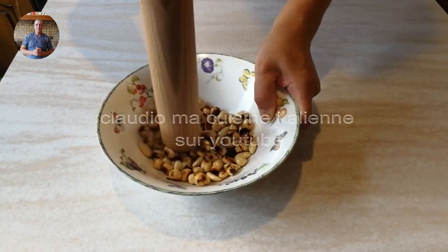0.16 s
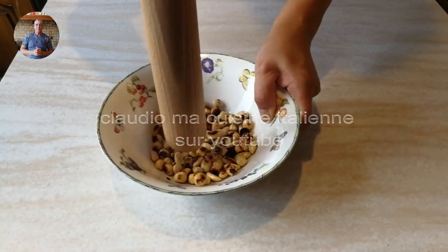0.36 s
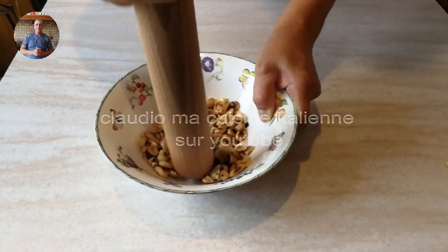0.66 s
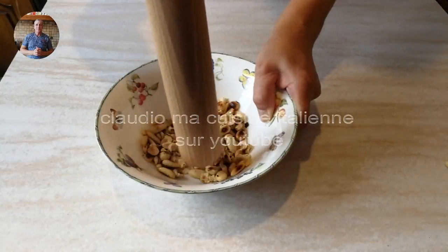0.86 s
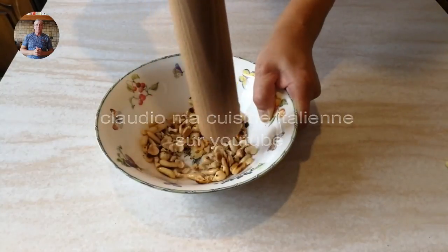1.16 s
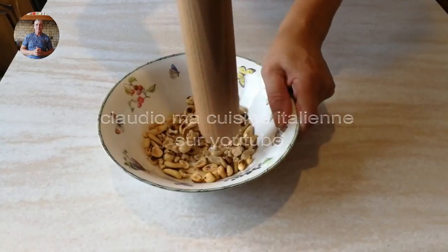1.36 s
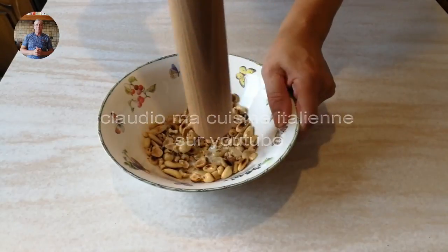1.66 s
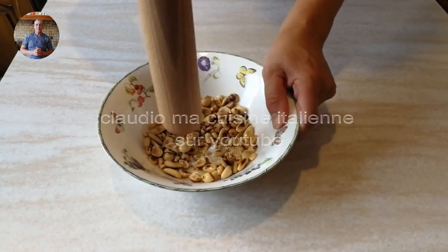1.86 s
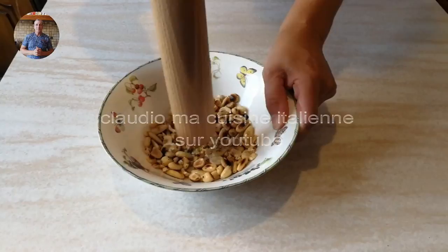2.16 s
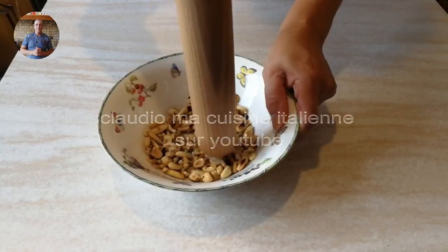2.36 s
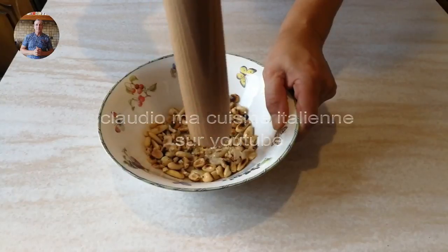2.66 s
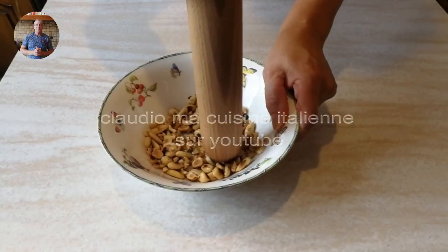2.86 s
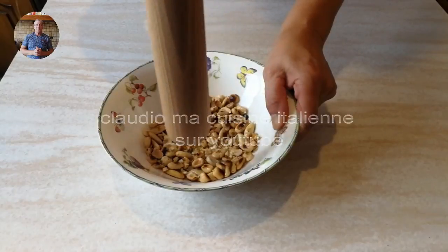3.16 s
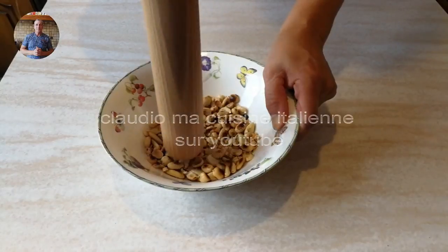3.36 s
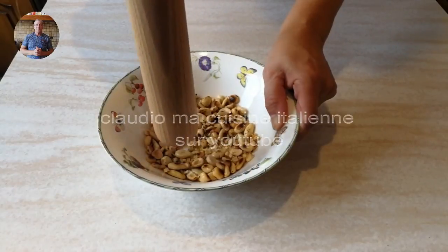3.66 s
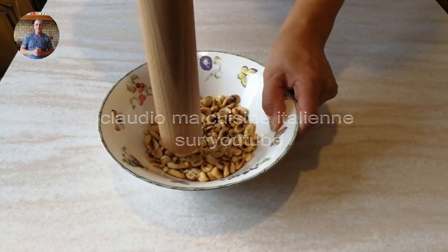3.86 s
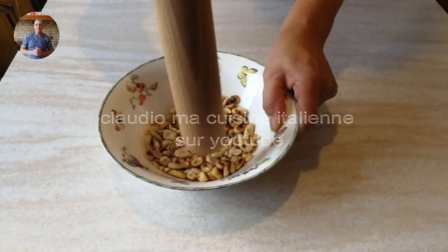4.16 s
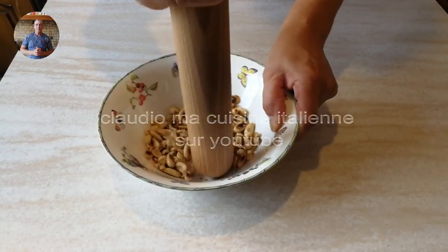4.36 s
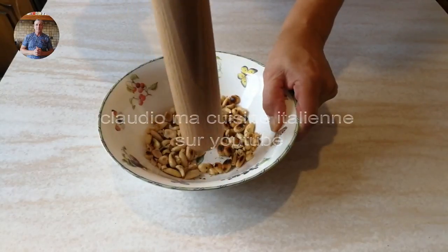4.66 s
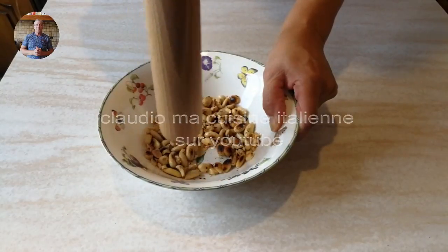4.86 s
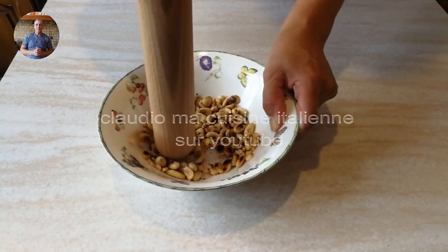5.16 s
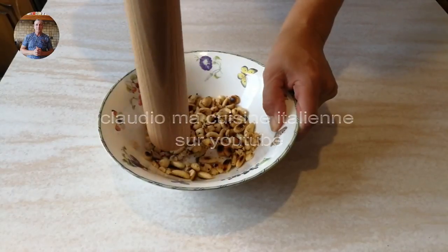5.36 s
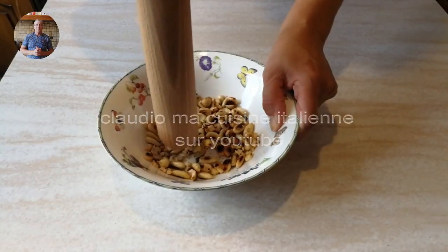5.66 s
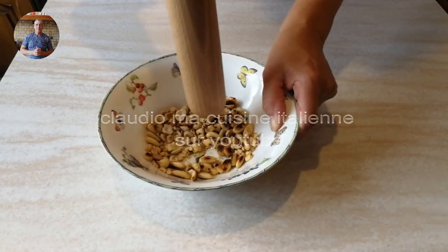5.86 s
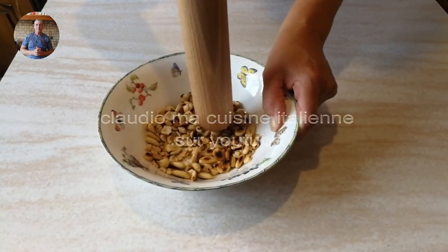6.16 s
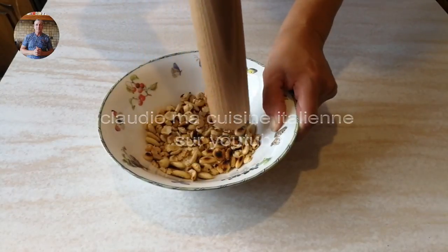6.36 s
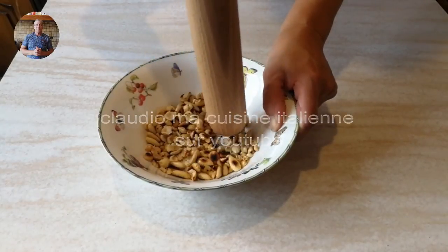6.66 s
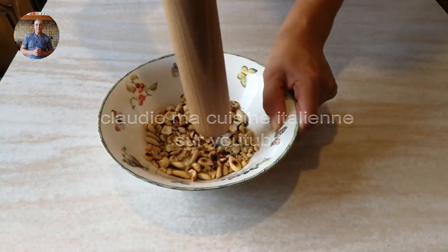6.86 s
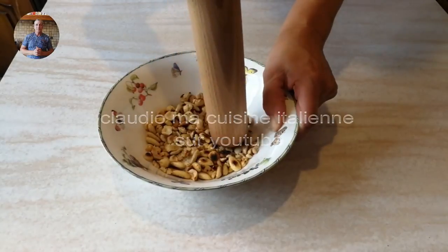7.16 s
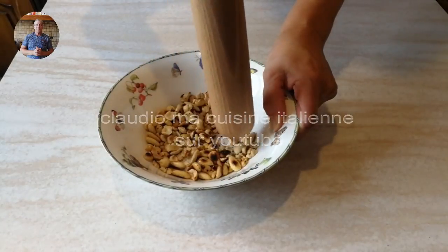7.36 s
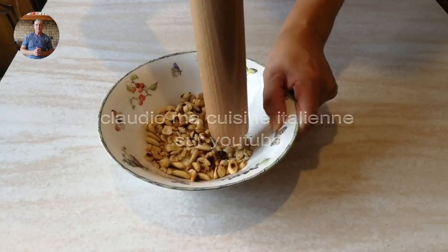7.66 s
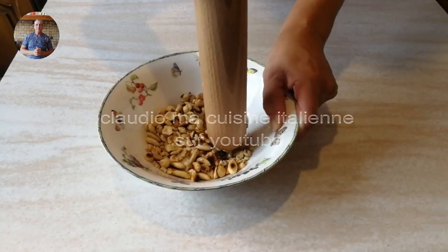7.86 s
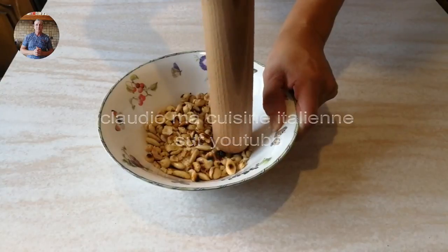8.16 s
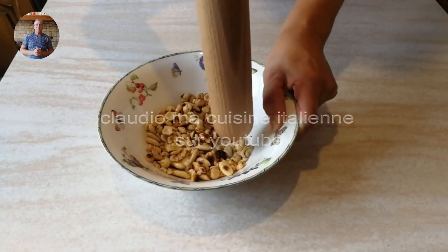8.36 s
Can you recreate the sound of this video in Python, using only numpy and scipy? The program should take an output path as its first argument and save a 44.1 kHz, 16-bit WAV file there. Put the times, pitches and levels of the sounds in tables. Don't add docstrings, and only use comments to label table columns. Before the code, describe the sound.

Close stereo pickup in a small, hard kitchen, the bowl just left of centre, over very faint fridge hum and hiss that dip around loud blows. From 0 to 0.9 s a wooden pestle presses into toasted nuts with cushioned, crunchy blows near 0.2, 0.5 and 0.7 s; shards tick the glazed wall and nuts trickle back. A sharp crack comes at 1.0 s, a firm knock and table thump at 1.5, a crisp glancing crunch at 2.0, then solid knocks at 2.4 and 2.8. The hardest woody blows fall at 3.4, 3.9 and 5.5 s, with a softer, ticking crunch at 4.3 and a dry snap at 5.2. A faint foot drag follows 3.7. Lighter touches and ceramic ticks come around 6.0 to 6.5, a muffled thump at 7.1, another faint drag at 7.3, then steady knocks at 7.5, 7.8, 8.2 and 8.5, each with short room reflections.

```python
import sys
import numpy as np
from scipy import signal
from scipy.fft import rfft, irfft, next_fast_len
from scipy.io import wavfile
from scipy.ndimage import uniform_filter1d, minimum_filter1d

SR = 44100
rng = np.random.default_rng(int(sys.argv[2]) if len(sys.argv) > 2 else 0)


def to_wav(s):
    ch = np.atleast_2d(s).T
    pcm = np.round(np.clip(ch, -1, 1) * 32767)
    wavfile.write(sys.argv[1], SR, pcm.astype(np.int16))


def volts(x):
    e = np.asarray(x, float) / 20
    return 10 ** e


N = 375732
PAD = SR // 2
M = N + 3 * PAD

# (frequency [Hz], density [dB per Hz])
AIR_COLOUR = [(15, -85.5), (25, 3.5), (70, -24.5), (102, -2.5), (137, -32), (170, -20), (373, -26.5),
              (405, -22), (560, -25.5), (2000, -28), (2350, -30), (4740, -29.5), (16000, -43)]
# (frequency [Hz], likeness [-1 to 1])
LIKENESS = [(100, 0.99), (200, 0.96), (300, 0.74), (500, -0.53), (1000, 0.088), (3000, 0.025),
            (12000, -0.088)]
# (time [s], knock peak [dB], cushion of nuts under the pestle [dB], table thump [dB], table drum [dB])
BLOWS = [(-0.11, -46, 10, -46, -45), (0.183, -33, 20, -27, -33), (0.465, -26, 29, -28.5, -44.5),
         (0.695, -46, 20, -43, -56), (0.969, -19, 38, -33.5, -45), (1.468, -15, 5.5, -25, -33.5),
         (2.023, -37, 31, -44, -53), (2.408, -20, 7.5, -24, -35), (2.828, -17.5, 6, -24.5, -28),
         (3.415, -8.5, 7.5, -28, -36), (3.904, -8, 8.5, -29, -32.5), (4.346, -30.5, 14, -34.5, -51.5),
         (5.163, -19.5, 15, -32.5, -57.5), (5.212, -41, 3.5, -64.5, -67.5), (5.533, -7.5, 3, -29.5, -33.5),
         (6.068, -62, 5.5, -39.5, -53), (6.513, -40, 18, -34.5, -54), (7.091, -26.5, 31.5, -24.5, -36.5),
         (7.463, -51, 4.5, -43, -62), (7.481, -17, 7, -40, -46.5), (7.761, -22.5, 9, -30.5, -40.5),
         (8.160, -14.5, 10, -28.5, -38), (8.501, -13.5, 15, -20, -25)]
# (frequency [Hz], width [Hz], level [dB])
WOOD = [(632, 150, -9), (781, 90.5, 1), (890, 95, 1), (1050, 120, -1.5), (1290, 260, -5.5)]
# (frequency [Hz], width [Hz], level [dB])
CAVITY = [(270, 53, -1.5), (383.5, 23.7, 2), (516.6, 63, -1.5)]
# (frequency [Hz], width [Hz], level [dB])
HARD = [(1540, 170, 0), (2110, 554, 2.5), (2890, 730, -3.5), (4060, 1100, -15)]
# (frequency [Hz], level [dB], t60 [s])
TABLE = [(119.6, 4, 0.18), (102, -13.5, 0.086), (181, 2, 0.075), (46, -15, 0.58)]
# (frequency [Hz], level [dB], t60 [s])
DRUM = [(164, 0, 1.1)]
# (frequency [Hz], t60 [s])
KITCHEN_T60 = [(100, 0.41), (300, 0.3), (800, 0.38), (2000, 0.28), (5000, 0.39), (12000, 0.37)]
# (frequency [Hz], level [dB])
WALLS = [(100, 16.5), (400, 7.5), (1000, 0.5), (3000, -7.5), (8000, -8), (15000, -8.5)]
# (frequency [Hz], left over right [dB])
LEFT = [(100, -0.1), (250, 2), (600, 3.5), (1300, 3.5), (2400, 4), (4400, 11), (8000, 7), (13000, 17)]
# (time [s], length [s], level [dB])
SLIDES = [
    (-.05, .18, -51),
    (0.188, 0.23, -59.5),
    (0.514, 0.14, -58),
    (0.725, 0.27, -59),
    (1.055, 0.33, -64.5),
]
# (frequency [Hz], density [dB per Hz])
NUT = [(180, -25), (300, -21), (850, -9.5), (2000, -13.5), (2480, -8.5), (2800, -11.5), (3600, -10),
       (4100, -15.5), (6200, -14.5), (9000, -22), (13000, -32.5), (16000, -36)]
# (time of the loudest moment [s], level [dB], decay [ms], brightness [dB per octave])
CRUNCHES = [(-.03, -31, 18, 3.6), (0.1791, -26, 10.8, 0), (0.465, -27, 17, 2.7), (0.6878, -35, 30, 2.5),
            (0.9654, -11.5, 2.3, 0.5), (1.4652, -28.5, 3.7, 4), (2.0213, -18, 5.9, 3.5),
            (2.4039, -31, 2.4, -4.5), (2.824, -29, 19, -2.5), (3.4121, -19, 4.2, -1.4),
            (3.903, -23, 10.4, -1), (4.3407, -23, 8.3, 3.4), (5.161, -17, 0.9, 1.3),
            (5.5324, -20, 12, -2.5), (6.0467, -32.5, 20, 0.5), (6.5167, -32, 16, 0.1),
            (7.0899, -26, 8.2, 0.9), (7.4804, -47, 8, 0.5), (7.7608, -21.5, 5, 0.9), (8.1518, -24, 5.6, 0),
            (8.5034, -23, 6.2, -3.6)]
# (time [s], level [dB], decay [ms])
SNAPS = [(0.170, -33.5, 8), (0.4467, -39, 2.7), (0.5628, -36, 3.1), (0.6751, -37, 6.7), (2.0099, -36.5, 3),
         (3.5822, -39, 6.3), (3.6251, -44, 9.1), (4.3141, -29.5, 24), (4.4374, -41.5, 14),
         (6.0324, -45, 6.4), (6.1427, -45.5, 7.9), (6.1966, -44.5, 3.4), (6.5051, -34.5, 9.5),
         (7.1086, -40.5, 31), (7.466, -34.5, 19), (8.4903, -48, 8)]
# (time [s], at the rim [dB], low on the wall [dB], brightness [dB per octave])
TICKS = [(0.0423, -69, -57, -21), (0.2763, -52, -69.5, 0), (0.2950, -55.5, -69, -2),
         (0.3394, -62, -64, -32), (0.5651, -45, -44, -1.5), (0.678, -70, -45.5, -8), (0.6963, -52, -49, -6),
         (0.7344, -43.5, -63.5, 0), (0.824, -57, -80, -11), (4.3136, -41.5, -47, 4.5),
         (4.3425, -50, -38.5, -3.5), (4.3725, -70, -50, -5.5), (4.4363, -70, -50, 4.5),
         (4.5431, -70, -48.5, 0), (4.58, -55, -61, 0), (5.264, -70, -55.5, 1), (5.3368, -80, -66, 7.5),
         (6.0681, -39.5, -67, 3), (6.1459, -62, -55, -1), (6.2344, -50.5, -79.5, 0),
         (6.4974, -63.5, -54, -3.5), (6.5171, -38.5, -50.5, -4.5), (7.5288, -45, -52, -26),
         (8.4956, -50, -42, -5)]
# (time [s], level at the rim [dB])
GLANCES = [
    (0.1784, -29),
    (.464, -33),
    (.967, -35),
    (2.012, -44),
    (2.0195, -24),
    (6.1975, -34.5),
    (7.092, -34.5),
    (7.759, -28.5),
]
# (frequency [Hz], level [dB], t60 [s])
BOWL = [
    [(3630, 0, .065), (3605, -12, .3), (3505, -4, .06)],
    [(1340, 0, .04)],
    [(2290, 0, .07), (2480, -2, .04), (4850, -3, .05)],
    [(6050, 0, .05), (6200, -4, .04)],
    [(7100, 0, .05), (8130, -7, .04)],
]
RIM_SHARE = [0, -40, -36, -10, -24]
BELLY_SHARE = [0, -1, -2, -26, -9]
# (time [s], length [s], level [dB], pitch [Hz])
DRAGS = [
    (3.66, .2, -71, 1350),
    (7.268, .185, -70, 1380),
]


def unit(x):
    return x / np.sqrt(np.mean(x ** 2) + 1e-20)


def along(points, hz):
    f, v = np.transpose(points)
    return np.interp(np.log(hz + 1), np.log(f + 1), v)


def filtered(x, response):
    m = next_fast_len(x.shape[-1] + 8192)
    return irfft(rfft(x, m) * response(np.fft.rfftfreq(m, 1 / SR)), m)[..., :x.shape[-1]]


def add(track, s, x):
    track[..., PAD + round(s * SR):][..., :x.shape[-1]] += x


def paired(two):
    def mid_side(hz):
        turn = np.arccos(np.clip(along(LIKENESS, hz), -1, 1)) / 2
        return np.array([np.cos(turn), np.sin(turn)])

    mid, side = filtered(two, mid_side)
    return np.array([mid + side, mid - side])


def air():
    noise = filtered(rng.standard_normal((2, M)), lambda hz: volts(along(AIR_COLOUR, hz)))
    return volts(-61) * unit(paired(noise))


def body(modes):
    return lambda f: sum((-1) ** k * volts(db) * 1j * f * w / (c * c - f * f + 1j * f * w)
                         for k, (c, w, db) in enumerate(modes))


def ring(modes, t, scatter_db, attack):
    tone = 0
    for hz, db, t60 in modes:
        struck_db = db + scatter_db * rng.standard_normal()
        tone = tone + volts(struck_db - 60 * t / t60) * np.sin(2 * np.pi * hz * t)
    return tone * (1 - np.exp(-t / attack))


def pestle():
    near, thump, t = np.zeros(M), np.zeros(M), np.arange(PAD) / SR
    thump_lag_s = .0005
    stiff_hz = 60
    choke = np.exp(-(t / .24) ** 4)
    for s, knock_db, cushion_db, thump_db, drum_db in BLOWS:
        cavity_db = min(-12.5 + 0.68 * knock_db, -27)
        hard_db = knock_db - cushion_db
        push = .03 * rng.standard_normal(PAD) * (t / .003) * volts(-60 * t / .016)
        moments = np.array([-rng.integers(60, 100), 0, rng.integers(40, 120)])
        push[SR // 250 + moments] = .3, 1, .25
        parts = [(knock_db + 34, WOOD), (cavity_db + 39.0, CAVITY), (hard_db + 30.5, HARD)]
        knock = filtered(push[:SR // 5], lambda f: sum(volts(db) * body(modes)(f) for db, modes in parts))
        add(near, s - .003, knock)
        add(thump, s + thump_lag_s, volts(thump_db) * ring(TABLE, t, scatter_db=1.5, attack=0.00081))
        add(thump, s + thump_lag_s, volts(drum_db) * choke * ring(DRUM, t, scatter_db=0.5, attack=0.0027))
    return near, filtered(thump, lambda hz: (1j * hz / (stiff_hz + 1j * hz)) ** 2)


def placed(x, lead):
    side = np.array([[.5], [-.5]])
    return filtered(x, lambda hz: volts(side * along(LEFT, hz)) * np.exp(2j * np.pi * hz * side * lead))


def kitchen(x):
    out, stretch = np.zeros((2, M + SR)), SR // 5
    for start in range(0, M, stretch):
        hz, t, z = signal.stft(rng.standard_normal((2, 24000)), SR, nperseg=256)
        tail_db = along(WALLS, hz)[:, None] - 60 * t / along(KITCHEN_T60, hz)[:, None]
        tail = signal.istft(z * volts(tail_db), SR, nperseg=256)[1]
        wet = signal.fftconvolve(x[None, start:start + stretch], tail / 40, axes=1)
        out[:, start + 130:][:, :wet.shape[1]] += wet
    return paired(out[:, :M])


def stroke(t, s, length, edge):
    return np.clip(np.minimum(t - s, s + length - t) / edge, 0, 1) ** 2


def crackle(size, share, spread_db, bright_db=0):
    strength = volts(spread_db * np.minimum(rng.exponential(size=size), 3))
    clicks = (rng.random(size) < share) * strength * rng.standard_normal(size)
    return unit(filtered(clicks, lambda hz: volts(along(NUT, hz) + bright_db * np.log2(hz / 6000 + 0.037))))


def sliding():
    t = (np.arange(M) - PAD) / SR
    slide = sum(volts(db) * stroke(t, s, length, edge=.03) for s, length, db in SLIDES)
    return slide * crackle(M, share=0.14, spread_db=2.5, bright_db=-1.0)


def nuts():
    out, t = np.zeros(M), np.arange(SR // 4) / SR - .05
    press_ms, snap_ms, snap_bright_db = 2.2, 2, -.7
    rows = [(*row, press_ms) for row in CRUNCHES] + [(*row, snap_bright_db, snap_ms) for row in SNAPS]
    for s, db, fall_ms, bright_db, rise_ms in rows:
        swell = np.exp(-np.abs(t) * 1000 / np.where(t < 0, rise_ms, fall_ms + 0.071))
        clicks = crackle(len(t), share=0.43, spread_db=6.0, bright_db=bright_db)
        add(out, s + t[0] + .002, volts(db - 8.5) * swell * clicks)
    return out


def bowl():
    out, t = np.zeros(M), np.arange(PAD) / SR
    octaves = np.log2([modes[0][0] / 2000 for modes in BOWL])
    glances = [(s, db, -99, 0) for s, db in GLANCES]
    for s, rim_db, belly_db, bright_db in glances + list(TICKS):
        from_rim_db = rim_db + np.array(RIM_SHARE)
        from_belly_db = belly_db + np.array(BELLY_SHARE) + bright_db * octaves
        rings_db = np.maximum(from_rim_db, from_belly_db)
        rings_db[3] += -9 * (belly_db > -75)
        tone = sum(volts(db + 4.0) * ring(modes, t, scatter_db=5, attack=0.00021)
                   for db, modes in zip(rings_db, BOWL))
        tone[:2] += volts(max(rings_db) - 3) * np.array([1, -1])
        skid = 1 + 0.15 * unit(uniform_filter1d(rng.standard_normal(PAD), 150))
        add(out, s, tone * skid)
    return out


def dragging():
    out, t = np.zeros(M), (np.arange(M) - PAD) / SR
    rise_hz_per_s, swell_db = 200, 7
    for s, length, db, hz in DRAGS:
        fuzz = unit(uniform_filter1d(uniform_filter1d(rng.standard_normal((2, M)), 190), 190))
        u = np.clip(t - s, 0, length)
        turn = 2 * np.pi * (hz * t + rise_hz_per_s * u ** 2 / 2)
        tone = fuzz[0] * np.cos(turn) + fuzz[1] * np.sin(turn)
        tone += .3 * fuzz[1] * np.cos(1.29 * turn)
        level = volts(db + 12.5 - swell_db * np.abs(3 * u / length - 2) / 2)
        out += level * stroke(t, s, length, edge=.012) * tone
    return out


def scene():
    near, thump = pestle()
    near = near + nuts()
    rim = sliding() + bowl() + dragging()
    walls = kitchen(near + .4 * rim + .07 * thump)
    walls = filtered(walls, lambda hz: volts(0.38 * np.array([[1], [-1]]) * along(LEFT, hz)))
    mix = placed(near + rim, lead=.0001) + thump + volts(5.0) * walls
    return mix[:, PAD:PAD + N]


def band_limit(x):
    return signal.sosfilt(signal.butter(12, 16510, fs=SR, output="sos"), x)


def record(dry):
    loud_db = 10 * np.log10(np.abs(uniform_filter1d(np.mean(dry ** 2, 0), 220)) + 1e-12)
    over_db = np.clip(loud_db + 35.5, 0, None)
    ahead_db = -minimum_filter1d(-over_db, 1400)
    after_db = signal.lfilter([1 / 6000], [1, 1 / 6000 - 1], over_db)
    floor = air()[:, :N] * volts(-uniform_filter1d(1.1 * ahead_db, 130) - 1.4 * after_db)
    band = lambda hz: (hz < 16100) * (1j * hz / (35 + 1j * hz)) ** 2
    heard = filtered(dry + floor, band)
    heard = heard / (1 + np.abs(heard / .9) ** 4) ** .25
    return band_limit(heard)


dry = scene()
out = record(dry)
to_wav(out)
```